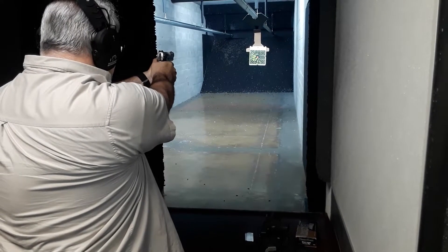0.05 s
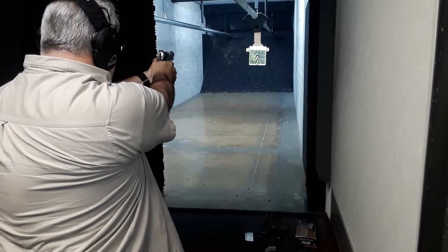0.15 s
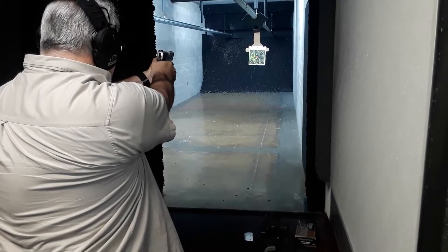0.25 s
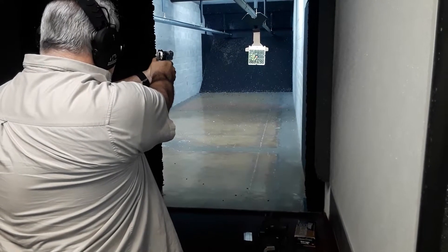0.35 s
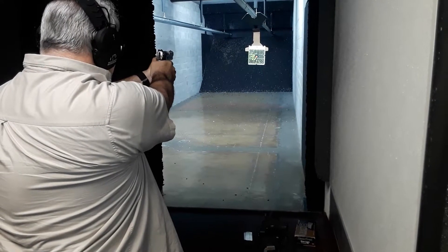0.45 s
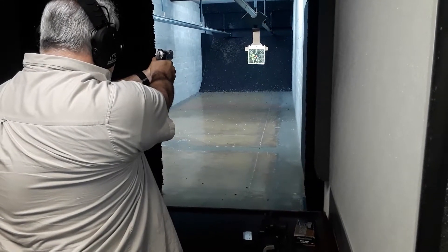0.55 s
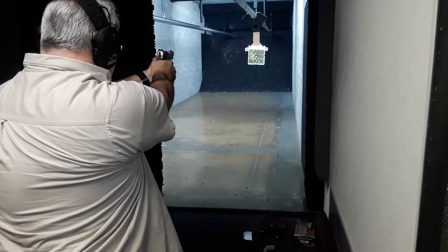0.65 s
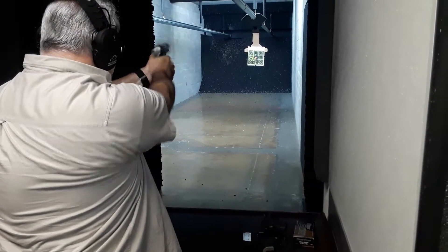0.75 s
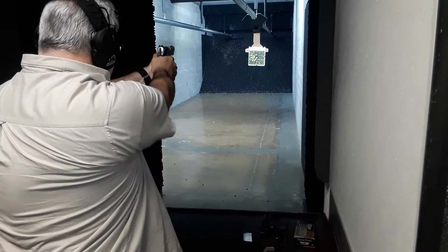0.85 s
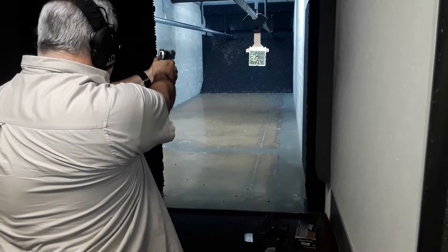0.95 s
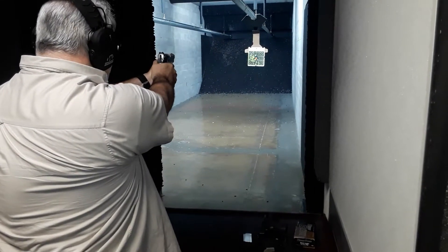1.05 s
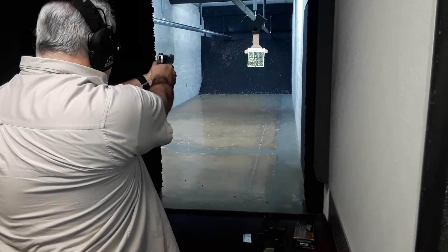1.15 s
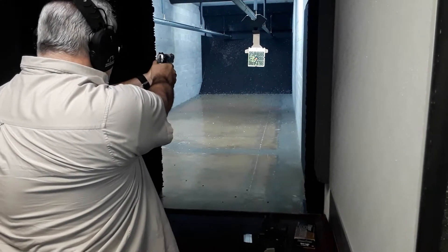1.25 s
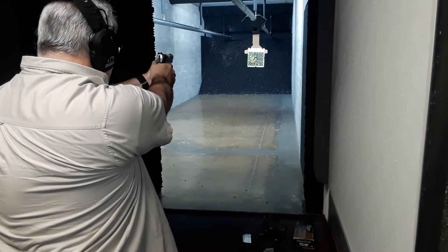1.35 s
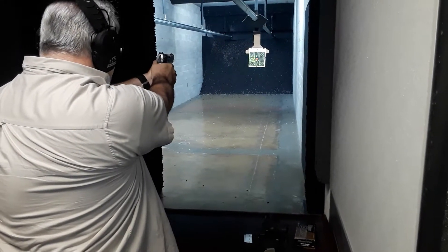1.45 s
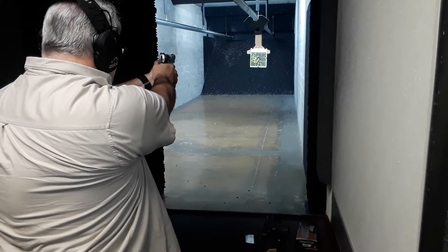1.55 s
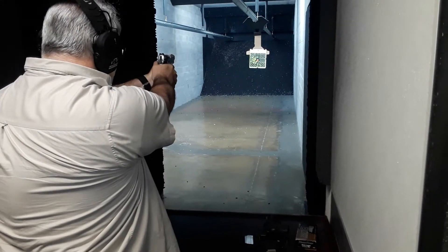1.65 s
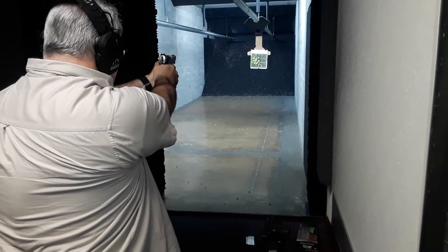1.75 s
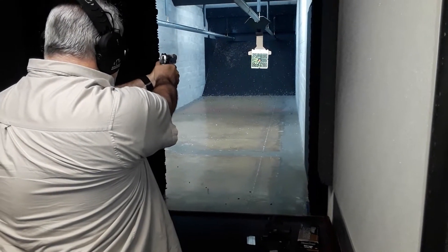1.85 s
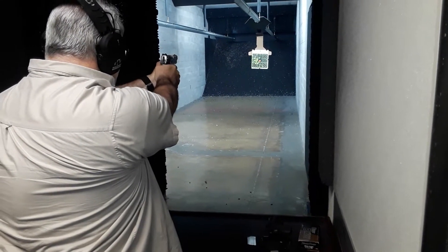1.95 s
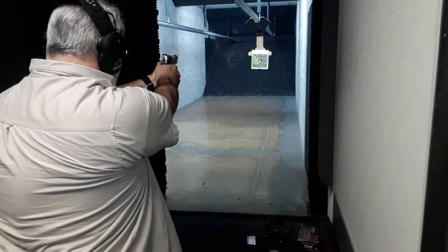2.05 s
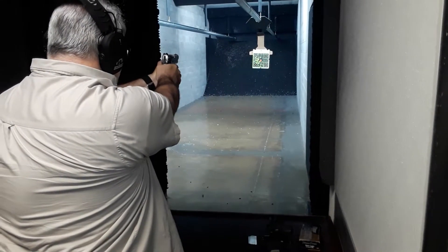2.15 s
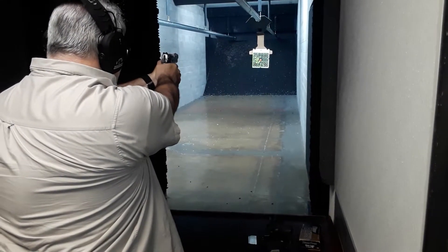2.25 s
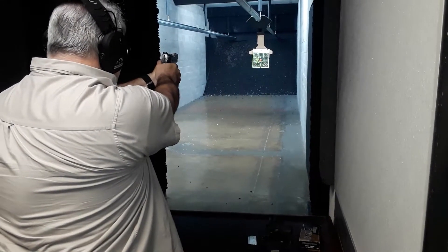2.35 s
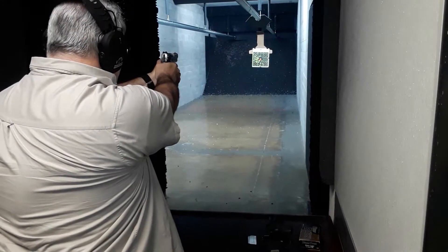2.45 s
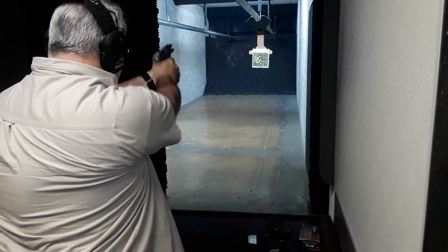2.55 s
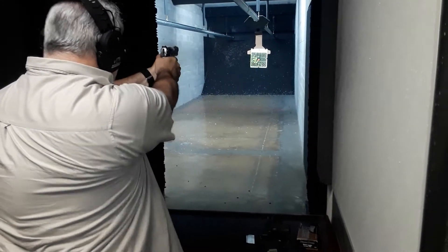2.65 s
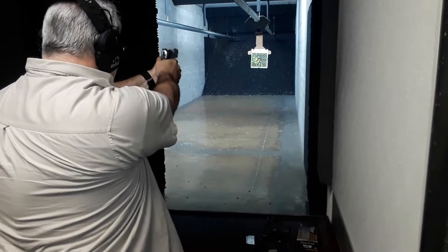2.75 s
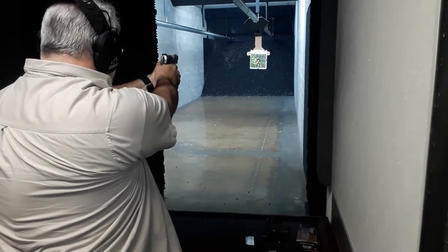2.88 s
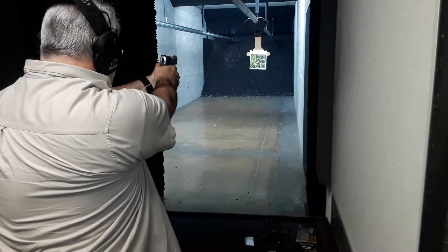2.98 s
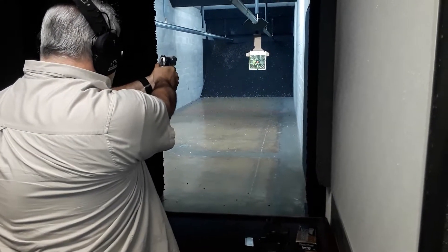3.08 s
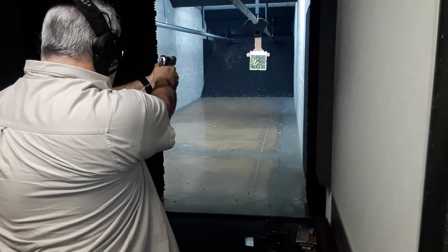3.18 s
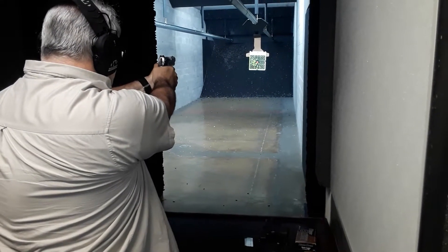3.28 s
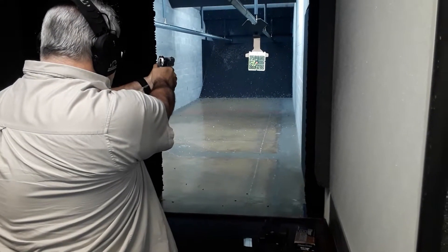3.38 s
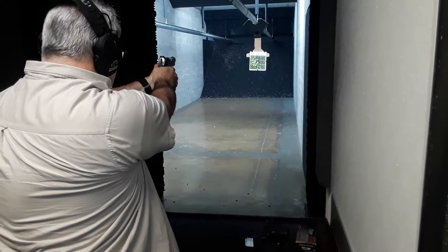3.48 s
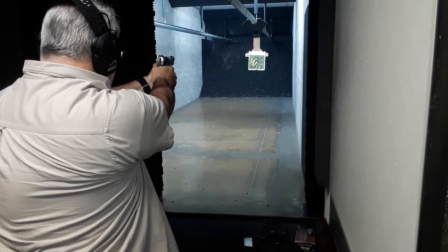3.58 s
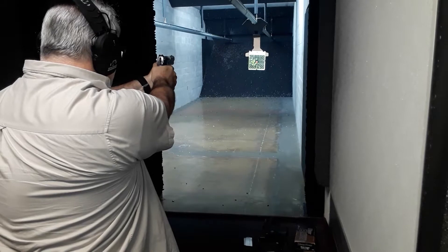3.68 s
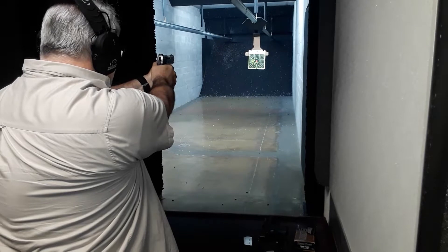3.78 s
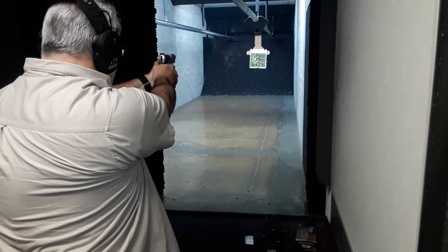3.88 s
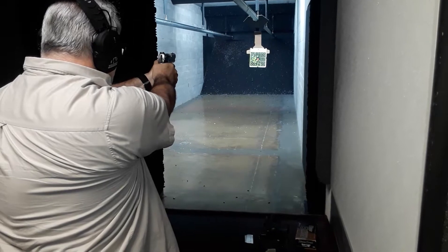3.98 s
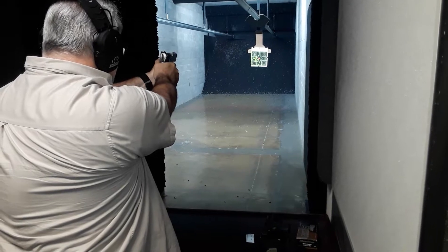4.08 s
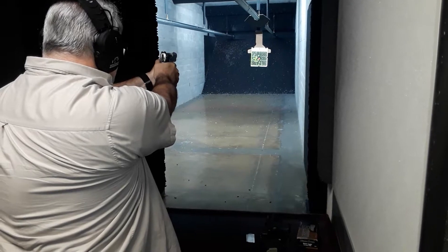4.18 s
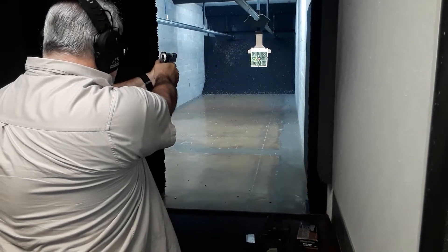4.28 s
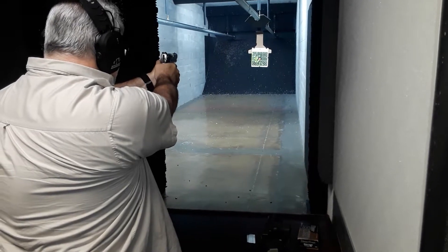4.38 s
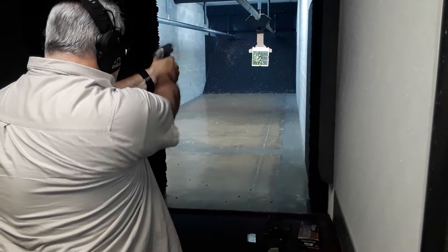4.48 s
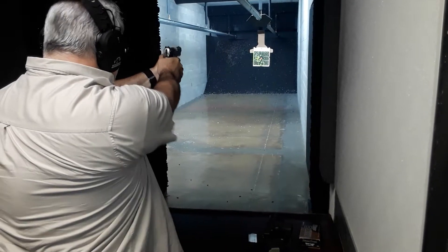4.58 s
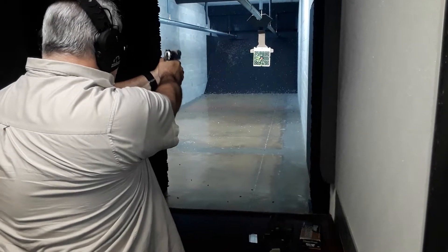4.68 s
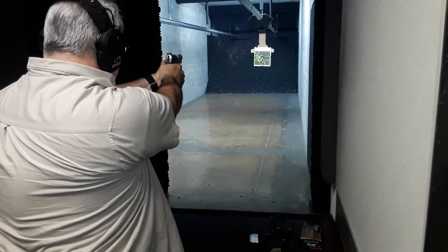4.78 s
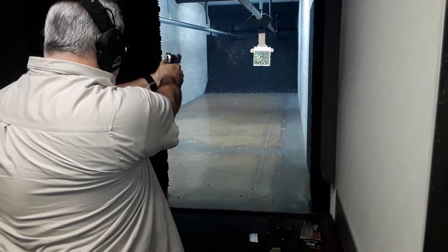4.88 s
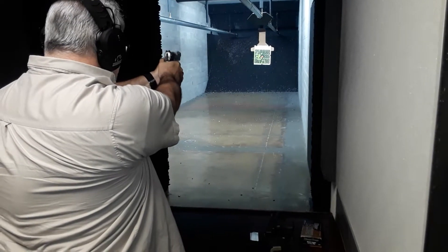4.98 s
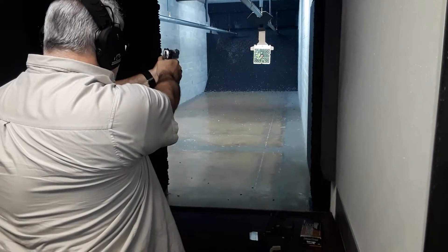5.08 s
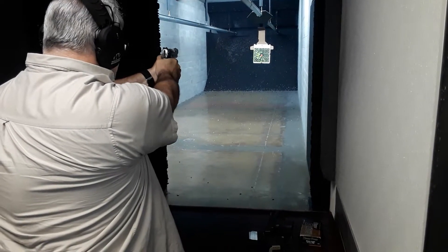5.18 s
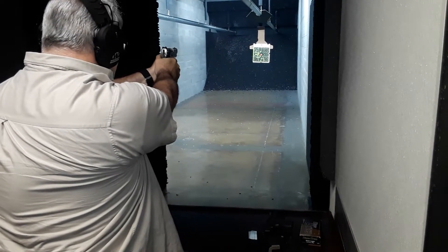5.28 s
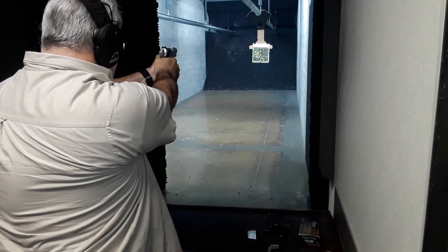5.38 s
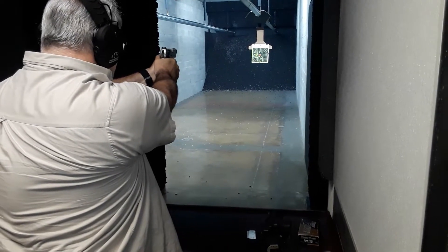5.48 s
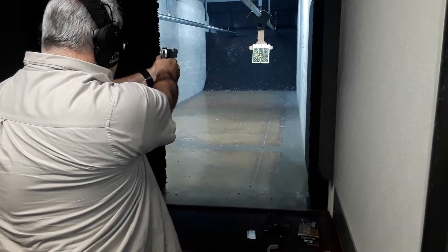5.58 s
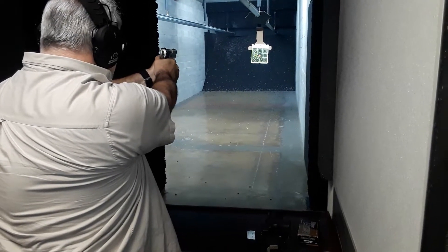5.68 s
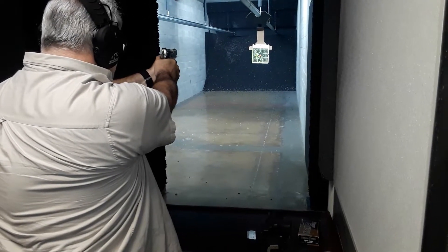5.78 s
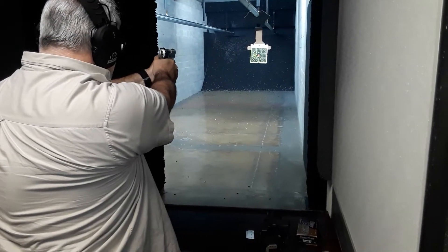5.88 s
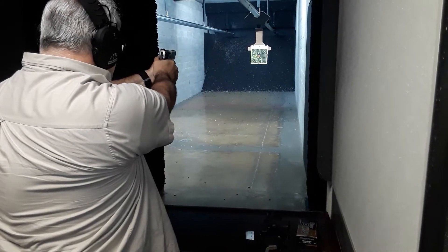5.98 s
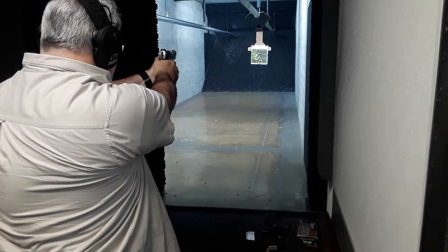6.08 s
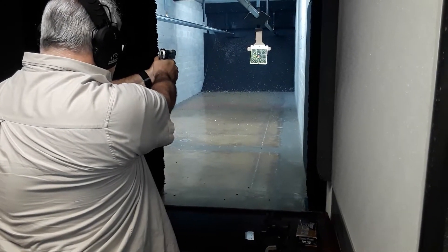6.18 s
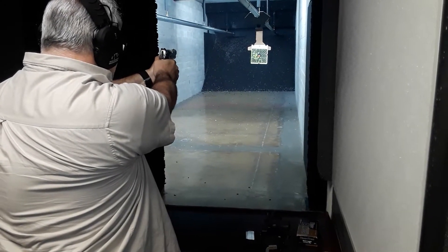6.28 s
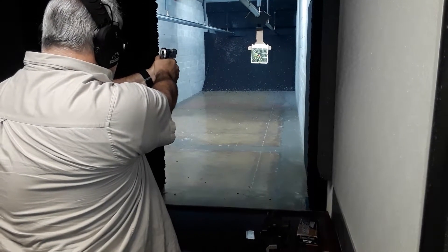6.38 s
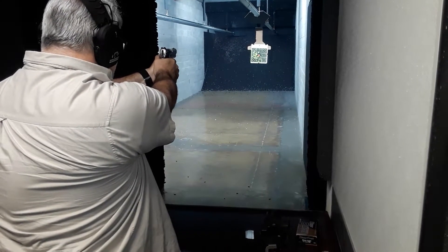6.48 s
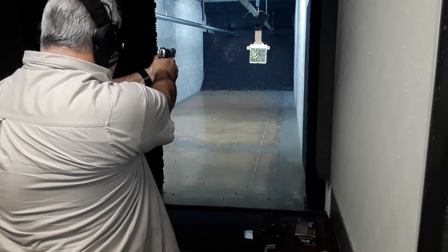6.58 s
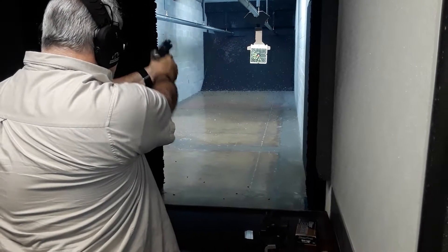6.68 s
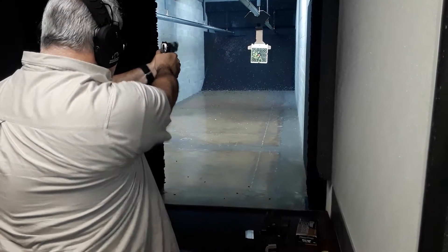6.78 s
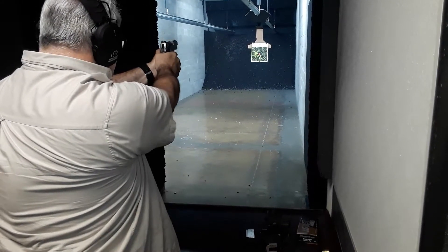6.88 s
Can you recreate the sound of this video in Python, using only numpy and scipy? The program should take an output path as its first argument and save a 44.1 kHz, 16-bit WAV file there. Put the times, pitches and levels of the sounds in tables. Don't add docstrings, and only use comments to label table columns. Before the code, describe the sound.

Close, distorted pistol blasts about two seconds apart, each with quick echoes and a booming tail, while air vents rush and spent cases clink.

```python
import sys
import numpy as np
from scipy import signal
from scipy.fft import rfft, irfft, next_fast_len
from scipy.io import wavfile
from scipy.ndimage import uniform_filter1d, minimum_filter1d

SR = 44100
rng = np.random.default_rng(int(sys.argv[2]) if len(sys.argv) > 2 else 0)


def magnitude_from_level(level_db):
    exponent = np.asarray(level_db, float) / 20
    return 10 ** exponent


def inscribe(sig):
    pcm = np.round(np.clip(np.atleast_2d(sig).T, -1, 1) * 32767)
    wavfile.write(sys.argv[1], SR, pcm.astype(np.int16))


N = 305613

# [t/s, level/dB, crack ahead of the blast/dB]
SHOTS = [
    (-1.55, 0, -30),
    (.7257, 0, -28),
    (2.5477, 0, -26),
    (4.4611, 0, -7),
    (6.6841, 0, -13),
]
# [f/Hz, side minus mid/dB]
FAN_SIDE = [(60, -20), (200, -18), (380, -10), (700, -7), (1290, -1), (4400, 1)]
# [f/Hz, side minus mid/dB]
HALL_SIDE = [(110, -16), (200, -13), (380, -7), (700, -8), (1290, -3), (4400, 0)]


def table(rows, hz):
    corners_hz = [row[0] for row in rows]
    values = [row[1] for row in rows]
    return np.interp(np.log(np.maximum(hz, 1)), np.log(corners_hz), values)


def noise(size, spectrum, side):
    # [f/Hz, left minus right/dB]
    left_db = [(60, -.5), (300, -1.5), (1290, -2), (2400, -.5), (12000, 0)]
    fast = 2 * next_fast_len(size // 2 + 1)
    hz = np.arange(fast // 2 + 1) * SR / fast
    mid, edge = rfft(rng.standard_normal((2, fast))) * magnitude_from_level(table(spectrum, hz))
    edge = edge * magnitude_from_level(table(side, hz))
    lean = magnitude_from_level(table(left_db, hz) / 2)
    pair = irfft([(mid + edge) * lean, (mid - edge) / lean], fast)[:, :size]
    return pair / pair.std()


def fade(s, t60, swell=1e-4):
    rise = (1 - np.exp(-s / max(swell, 1e-5))) ** 2
    return rise * magnitude_from_level(-60 * s / t60)


def add(out, sound, s):
    i = int(s * SR)
    out[:, i:i + sound.shape[-1]] += sound[..., :out.shape[1] - i]


def walk(rate, size=N):
    hold = int(SR / rate)
    steps = np.repeat(rng.standard_normal(size // hold + 1), hold)
    return 1.3 * uniform_filter1d(uniform_filter1d(steps, hold), hold)[:size]


def ventilation():
    # [f/Hz, level/dB per Hz]
    duct = [(15, -64), (25, -34), (43, -27), (62, -15), (101, -5), (145, -6), (179, 1), (210, -3),
            (243, -1), (275, -9), (327, -6), (480, -16), (620, -46), (1060, -120)]
    # [f/Hz, level/dB per Hz]
    air = [(280, -31), (480, -1), (540, -3), (1000, -1), (1110, -3), (1210, -1), (1750, -1), (4270, -25),
           (5090, -26), (6260, -34), (8030, -35), (9860, -45), (14000, -49), (16000, -57)]
    duct_db, air_db = -28.4, -31.8
    gust_db = .4 * walk(1.5) + 1.2 * walk(9)
    rumble = magnitude_from_level(duct_db + gust_db) * noise(N, duct, FAN_SIDE)
    rush = magnitude_from_level(air_db + .4 * walk(3)) * noise(N, air, FAN_SIDE)
    return rumble + rush


def case_ticks():
    # [t/s, level/dB, centre f/Hz, width/Hz, t60/s]
    ticks = [(.3936, -51, 7900, 1600, .08), (.3936, -56, 12000, 8000, .08), (5.491, -41, 800, 600, .04),
             (2.9827, -41, 4200, 600, .02), (2.9827, -57, 11000, 8000, .02),
             (4.7587, -24, 14200, 2600, .012), (4.76, -25, 5000, 1600, .025),
             (4.7587, -40, 9000, 6000, .015), (4.7675, -33, 11500, 7000, .008),
             (4.76, -45, 12000, 8000, .12), (5.9585, -48, 8500, 9000, .14), (5.968, -50, 10000, 8000, .04)]
    out, s = np.zeros((2, N)), np.arange(int(.3 * SR) // 2) / SR
    for at, db, hz, width_hz, t60 in ticks:
        band = [(max(hz - width_hz, 250), -40), (hz - width_hz / 2, -3),
                (hz + width_hz / 2, -3), (hz + width_hz, -40)]
        add(out, magnitude_from_level(db) * noise(len(s), band, FAN_SIDE) * fade(s, t60), at)
    return out


def case_rings():
    # [t/s, level/dB, f/Hz, t60/s]
    rings = [(.402, -49, 10030, .25), (.607, -57, 10030, .25), (.625, -62, 7270, .3), (.675, -60, 7270, .2),
             (3.0, -63, 7300, .12), (3.005, -75, 11600, .15), (3.035, -76, 11600, .2),
             (3.195, -62, 7300, .3), (4.761, -33, 7130, .07), (4.765, -48, 7490, .07),
             (4.782, -55, 11510, .08), (4.804, -50, 7130, .13), (6.005, -63, 7400, .1)]
    swell_share = .055
    out, s = np.zeros((2, N)), np.arange(int(.3 * SR)) / SR
    for at, db, hz, t60 in rings:
        wobble = magnitude_from_level(3.5 * walk(110, len(s)))
        phase = rng.random() + .15 * rng.random((2, 1))
        tone = np.sin(2 * np.pi * (hz * s + phase))
        add(out, magnitude_from_level(db) * wobble * tone * fade(s, t60, swell_share * t60), at)
    return out


def shelf_knock():
    # [t/s, level/dB, tilt/dB per octave]
    knocks = [
        (5.9577, -4.5, -9),
        (5.96, -2.5, -3.5),
        (5.968, -9, .1),
        (5.9735, -16, .1),
        (5.979, -15, .1),
    ]
    # [f/Hz, level/dB, t60/s]
    shelf = [(754, -3, .03), (860, 0, .022), (1000, -3, .02), (1308, -2, .03), (1561, -2, .04),
             (1916, -6, .04), (2400, -15, .02), (3100, -20, .012)]
    out, s = np.zeros((2, N)), np.arange(int(.3 * SR) // 2) / SR
    for at, db, tilt_db in knocks:
        wood = np.zeros((2, len(s)))
        for hz, mode_db, t60 in shelf:
            tilted_db = mode_db + tilt_db * np.log2(hz / shelf[1][0])
            level = magnitude_from_level(tilted_db + 1.5 * rng.standard_normal((2, 1)))
            wood += level * np.sin(2 * np.pi * hz * s) * fade(s, t60, swell=.0006)
        add(out, magnitude_from_level(db - 8) * wood, at)
    return out


def blast(spike, spike_s=.00012, suck_s=.0004, suck=1.6):
    s = np.arange(SR // 100) / SR
    pressure = spike * np.exp(-s / spike_s)
    suction = suck * np.sin(s / suck_s) * np.exp(-s / (2.4 * suck_s))
    return pressure - suction


def hall(s):
    # [t after the shot/s, level/dB]
    echoes = [
        (0, 9),
        (.009, 3),
        (.041, 9),
        (.0535, 6),
        (.0795, 3),
        (.167, -3),
        (.187, -4),
    ]
    # [f/Hz, level/dB]
    roar = [(70, -34), (120, -4), (190, -2.5), (330, -6.5), (600, 1), (1250, 2), (2100, -4), (3500, -8.5),
            (6000, -19), (8200, -13), (10400, -19), (13000, -12)]
    # [f/Hz, build-up/s]
    build_up = [(200, .058), (330, .02), (3500, .022), (8200, .065)]
    # [f/Hz, level/dB, t60/s]
    modes = [(194, 0, .8), (228, -1, .6), (322, -4, .6), (361, -9, 1.1), (466, -4, .6), (587, -4, .75),
             (727, -6, .85), (824, -6, .75), (940, -4, .7), (1037, -7, .7), (1136, -5, .7), (1230, -6, .9),
             (1317, -11, 1.2), (700, -15, 1.3)]
    # [t after the shot/s, level/dB, f/Hz]
    booms = [
        (.034, 5.5, 238),
        (.043, 3.5, 315),
        (.098, 1.5, 725),
        (.165, -3.5, 195),
    ]
    t60_1k_s, t60_slope, air_loss_hz = .625, -.12, 25000
    out = np.zeros((2, len(s)))
    for delay, db in echoes:
        spike = .4 * np.exp(-delay / .015)
        add(out, magnitude_from_level(db) * blast(spike, suck_s=.0005 + .004 * min(delay, .05)), delay)
    for k, (hz, db) in enumerate(roar):
        t60 = t60_1k_s * (hz / 1000) ** t60_slope / (1 + (hz / air_loss_hz) ** 2)
        skirt = [(28, -30 - 10. * k ** 2)]
        skirt += [(row[0], -10. * (j - k) ** 2) for j, row in enumerate(roar)]
        out += magnitude_from_level(db) * noise(len(s), skirt, HALL_SIDE) * fade(s, t60, table(build_up, hz))
    for hz, db, t60 in modes:
        phase = rng.random()
        level = magnitude_from_level(db - 11.5 + 4.5 * walk(30, len(s)))
        out += level * np.sin(2 * np.pi * (hz * s + phase)) * fade(s, t60, swell=.04)
    for delay, db, hz in booms:
        add(out, magnitude_from_level(db) * np.sin(2 * np.pi * hz * s) * fade(s, .14, swell=.01), delay)
    return out


def shots():
    # [f/Hz, level/dB per Hz]
    capsule_hash = [(35, -41), (60, -11), (369, -3), (1160, -3), (1300, -5), (1430, 0), (1800, -3),
                    (1970, -1), (3620, -10), (3880, -9), (8180, -19), (10600, -26), (13000, -19),
                    (15700, -23)]
    out, s = np.zeros((2, N)), np.arange(int(1.2 * SR)) / SR
    answer = hall(s)
    overload = magnitude_from_level(-.5) / (1 + np.exp((s - .04) / .01)) + magnitude_from_level(.5) * fade(s, t60=.36)
    for at, db, crack_db in SHOTS[1:]:
        fizz = noise(len(s), capsule_hash, HALL_SIDE)
        hashed = overload * fade(s, 2.5, swell=.001) * fizz
        add(out, magnitude_from_level(db) * (answer + hashed), at)
        crack = fade(s, .03, swell=.001) * fizz[:, ::-1]
        add(out, magnitude_from_level(crack_db) * crack, at - .003)
    return signal.sosfilt(signal.butter(3, 90, "high", fs=SR, output="sos"), out)


def gain_control():
    duck_db, hold_s, return_s, creep_db_per_s = -14.4, 1.39, .065, 1.2
    s = np.arange(N) / SR
    fired = np.array([row[0] for row in SHOTS])
    since = s - fired[np.searchsorted(fired, s) - 1]
    ducked = duck_db / (1 + np.exp((since - hold_s) / return_s))
    return ducked + creep_db_per_s * np.maximum(since - 2, hold_s - 2)


def scene():
    lane = shots() + magnitude_from_level(gain_control()) * ventilation()
    port_lag = 2
    right = np.pad(lane[1], (port_lag, 0))[:N]
    brass = case_ticks() + case_rings() + shelf_knock()
    return np.array([lane[0], right]) + brass


def top_cut(x):
    return signal.sosfilt(signal.butter(12, 16340, fs=SR, output="sos"), x)


def record(dry):
    look = int(.0075 * SR)
    dry = signal.sosfilt(signal.ellip(10, .2, 60, 15850, fs=SR, output="sos"), dry)
    dry = signal.sosfilt(signal.butter(2, 50, "high", fs=SR, output="sos"), dry)
    peak = np.abs(dry).max(axis=0)
    gain = minimum_filter1d(1 / np.maximum(peak / 1.38, 1), 2 * look)
    held = 1.6 * np.tanh(uniform_filter1d(gain, look) * dry / 1.6)
    return top_cut(np.clip(held, -1, 1))


dry = scene()
out = record(dry)
inscribe(out)
```